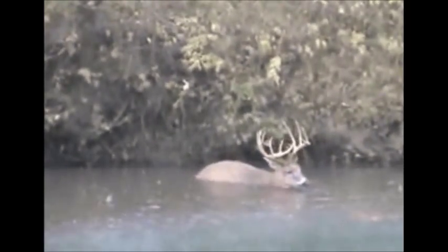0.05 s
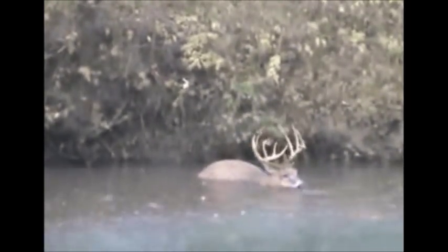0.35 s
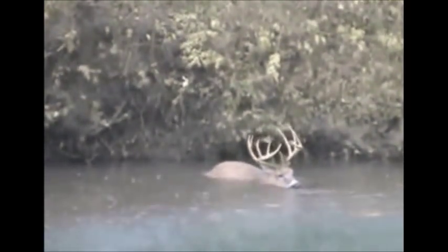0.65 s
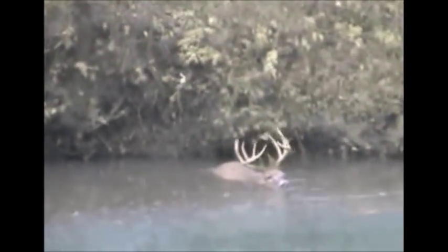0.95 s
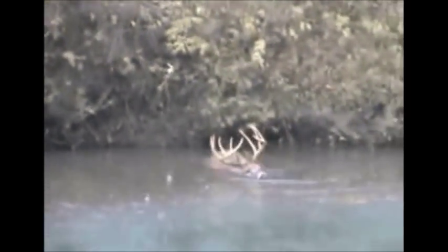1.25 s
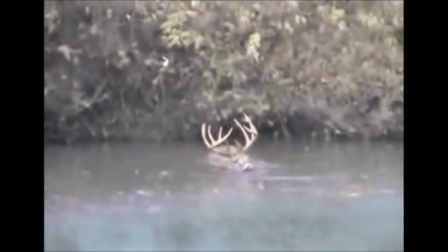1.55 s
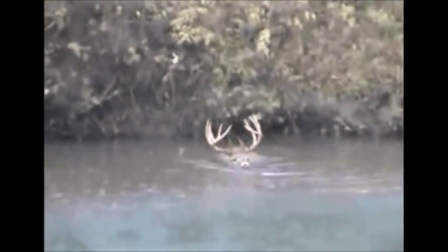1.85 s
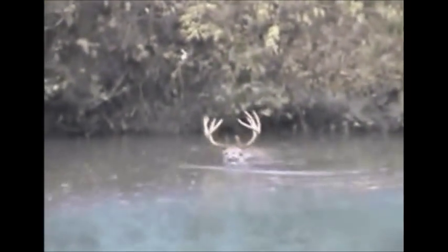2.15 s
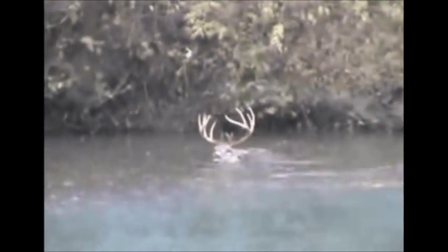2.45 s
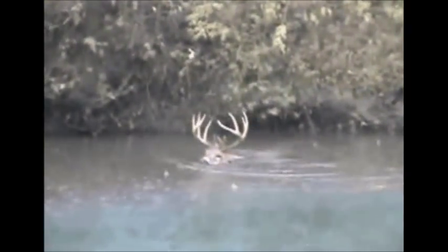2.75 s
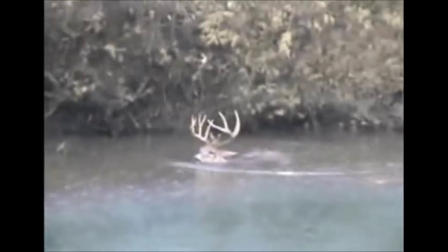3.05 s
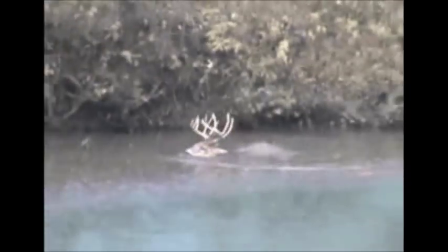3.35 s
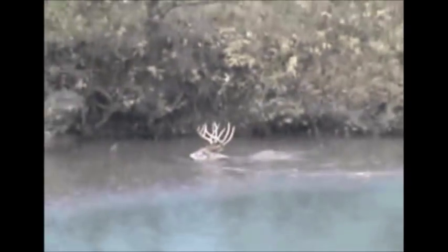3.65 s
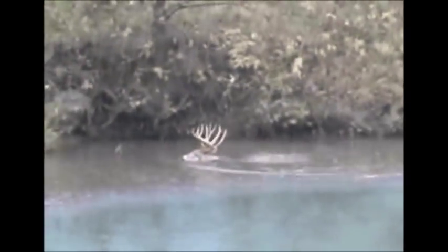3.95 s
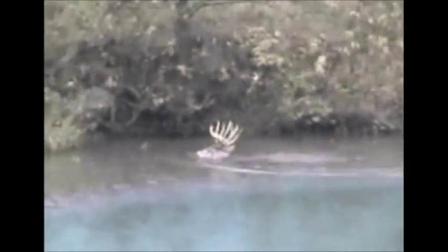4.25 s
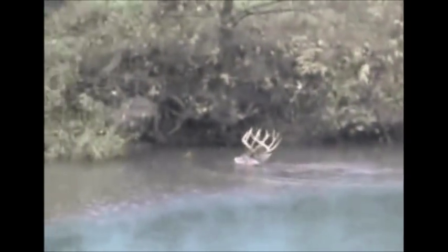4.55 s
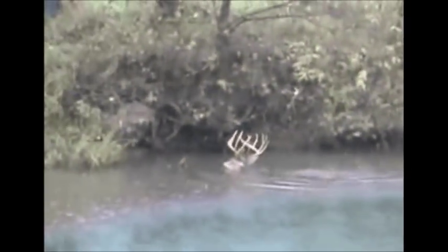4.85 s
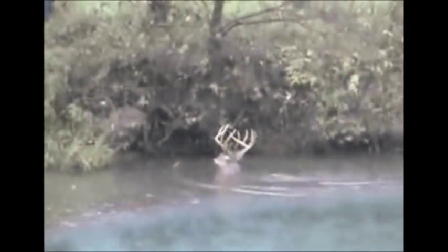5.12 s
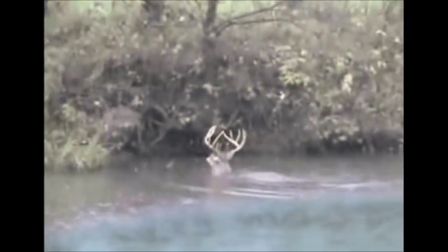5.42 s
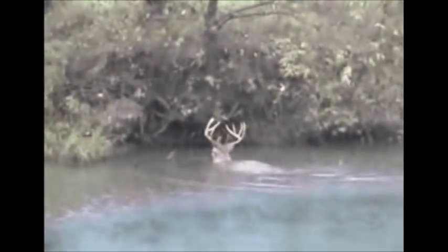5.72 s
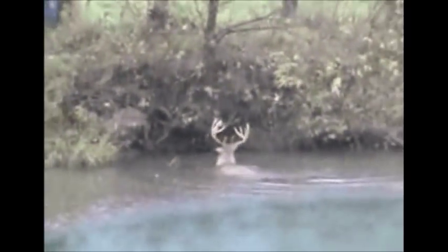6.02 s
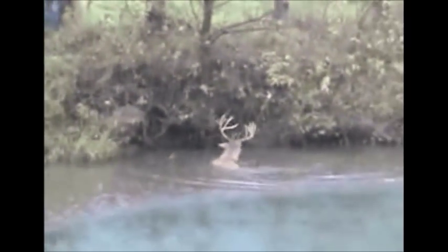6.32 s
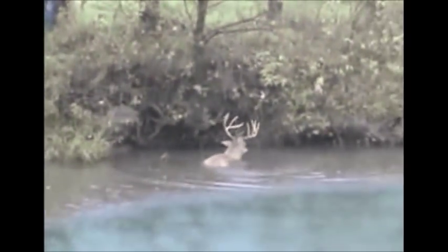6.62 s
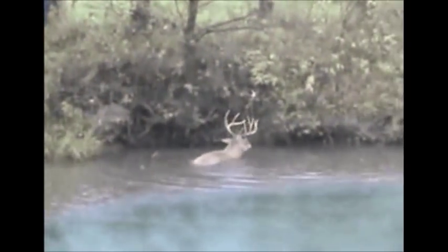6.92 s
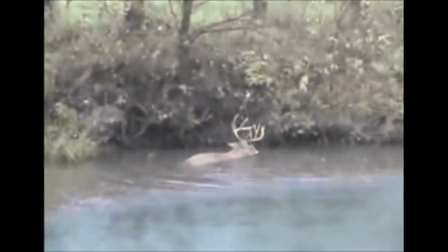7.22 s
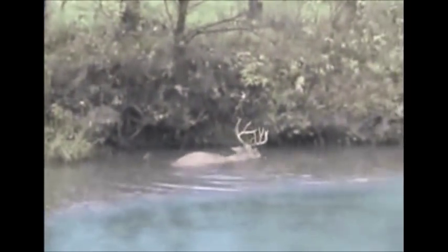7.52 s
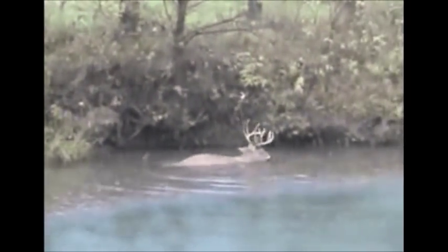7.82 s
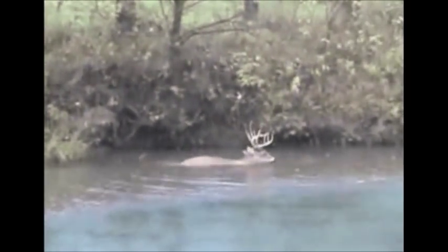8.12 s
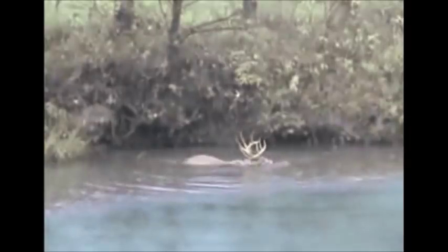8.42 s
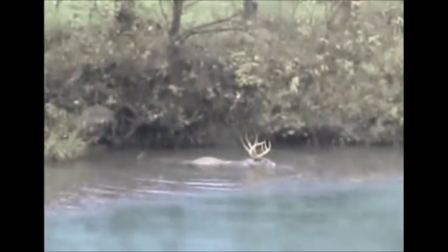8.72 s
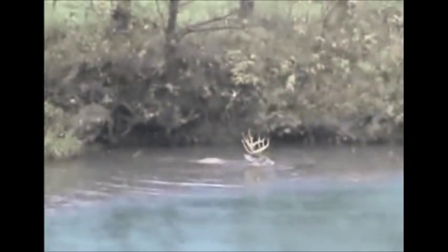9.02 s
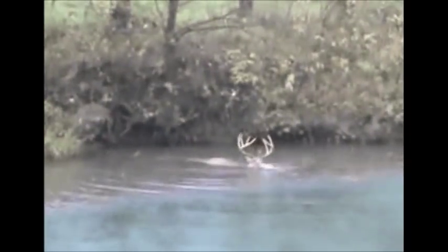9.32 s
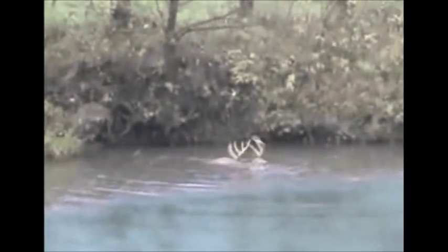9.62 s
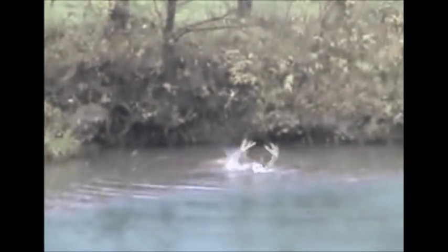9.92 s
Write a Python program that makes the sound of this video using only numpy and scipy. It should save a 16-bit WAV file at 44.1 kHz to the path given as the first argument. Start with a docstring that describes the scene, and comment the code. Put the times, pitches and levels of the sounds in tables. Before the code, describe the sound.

Light rain hisses steadily on a river, heard from inside a car idling on the bank. Close to the microphone a turn signal ticks and tocks evenly over a faint engine hum and a low, uneven rumble. Drops tap on the car now and then. Around the middle a few small plops come from the water, and later one soft, deep thump sounds on the car body.

```python
"""A soft hiss of light rain over a low, uneven rumble, heard from inside an idling car on a river bank.
Far drops on the river blend into the hiss; close to the microphone the engine hums in the cabin,
the indicator relay ticks on and off in the dashboard, and light drops tap on the car.
Short taps and dull knocks stand out of the rain, and the rumble briefly swells and surges;
later come a few plops into the water and one soft thump on the car body."""
import sys
import numpy as np
from scipy import signal
from scipy.fft import rfft, irfft
from scipy.io import wavfile
from scipy.ndimage import uniform_filter1d

SR = 44100
rng = np.random.default_rng(int(sys.argv[2]) if len(sys.argv) > 2 else 0)


def to_wav(s):
    """Save 16-bit WAV."""
    ch = np.atleast_2d(s).T  # columns
    pcm = np.round(np.clip(ch, -1, 1) * 32767)  # PCM
    wavfile.write(sys.argv[1], SR, pcm.astype(np.int16))


N = 439677


def undb(db):
    """Decibels to amplitude."""
    return 10 ** (np.asarray(db) / 20)


def unit(x):
    """Scale to rms 1."""
    return x / np.sqrt(np.mean(x ** 2))


def curve(rows):
    """Rows of (time [s], value) joined by straight lines."""
    return np.interp(np.arange(N) / SR, *np.transpose(rows))


def walk(per_s):
    """Random levels held for 1 / per_s seconds and smoothed twice; rms 1."""
    hold = int(SR / per_s)
    steps = np.repeat(rng.standard_normal(N // hold + 1), hold)
    return unit(uniform_filter1d(uniform_filter1d(steps, hold), hold)[:N])


def band(x, low_hz, high_hz, order=3):
    """Causal band-pass."""
    sos = signal.butter(order, [low_hz, high_hz], "band", fs=SR, output="sos")
    return signal.sosfilt(sos, x + 1e-18)


def colour(x, points):
    """Shape a spectrum by (frequency [Hz], gain [dB]) points, falling steeply beyond them; rms 1."""
    hz, db = np.transpose(points)
    bin_hz = np.maximum(np.arange(N // 2 + 1) * SR / N, 1)
    gain = undb(np.interp(np.log(bin_hz), np.log(hz), db))
    skirts = np.minimum(1, np.minimum(bin_hz / hz[0], hz[-1] / bin_hz)) ** 6
    return unit(irfft(rfft(x) * gain * skirts, N))


def fade(t, t60):
    """Exponential decay, 60 dB in t60 seconds."""
    return np.exp(-np.log(1000) * t / t60)


def add(out, start_s, sound):
    """Mix a sound in at start_s."""
    i = max(int(start_s * SR), 0)
    out[i:i + len(sound)] += sound[:max(N - i, 0)]


def burst(low_hz, high_hz, t60, rise_s, tail_db, tail_t60):
    """A short contact noise and its reflections in the cabin; rms 1 over the first 10 ms."""
    t = np.arange(SR // 8) / SR
    envelope = (fade(t, t60) + undb(tail_db) * fade(t, tail_t60)) * (1 - np.exp(-t / rise_s))
    noise = band(rng.standard_normal(len(t)) * envelope, low_hz, high_hz)
    return noise / np.sqrt(np.mean(noise[:SR // 100] ** 2))


# Spectrum of the rain as it reaches the cabin: (frequency [Hz], relative level [dB])
RAIN_SPECTRUM = [(200, -16), (280, -0.5), (400, -0.76), (600, -3.5), (770, -4.5), (900, -9.5),
                 (1200, -12.5), (1700, -12), (2100, -17), (2800, -17.5), (4200, -23), (5300, -26),
                 (6700, -25.5), (7600, -28.5), (8400, -37)]
# Swell shared by hiss and patter: (time [s], gain [dB])
RAIN_SWELL = [(0, -36), (0.9, -38), (2, -38.5), (3, -38.5), (4.8, -38), (5.15, -38), (5.8, -38), (6.8, -37),
              (7.5, -36.5), (8.3, -38), (9.9, -36.5)]


def rain(drops_per_s=480, scatter_db=3.5, patter_db=-5.5, hiss_db=0.5, flicker_db=0.5):
    """Far out on the river countless drops make a hiss; nearer ones ring briefly, each at its own pitch."""
    t = np.arange(SR // 40) / SR
    patter = np.zeros(N)
    for when, pitch, size, ring in rng.random((int(drops_per_s * N / SR), 4)):
        hz = 320 * (8200 / 320) ** pitch
        cycles = 2 + 7 * ring
        strength = undb(scatter_db * min(-np.log(1 - size), 4)) * hz / np.sqrt(cycles)
        add(patter, when * N / SR, strength * np.sin(2 * np.pi * hz * t) * fade(t, cycles / hz))
    # reflections in the cabin smear every drop
    reflections = undb(-27) * rng.standard_normal(len(t)) * fade(t, t60=0.046)
    patter += signal.fftconvolve(patter, reflections)[:N]
    patter = undb(patter_db) * colour(patter, RAIN_SPECTRUM)
    hiss = rng.standard_normal(N) * undb(flicker_db * walk(per_s=14))
    hiss = undb(hiss_db) * colour(hiss, RAIN_SPECTRUM)
    return (hiss + patter) * undb(curve(RAIN_SWELL))


# Engine tones in the cabin: (multiple of the firing rate, level [dB])
ENGINE_ORDERS = [(1, -50), (5, -47.5)]


def engine(firing_hz=37.74, wander=0.02, waver_db=2.0):
    """Multiples of the firing rate hum around the microphone; the idle speed wanders."""
    phase = 2 * np.pi * np.cumsum(firing_hz * (1 + wander * walk(per_s=3))) / SR
    return sum(undb(db + waver_db * walk(per_s=6)) * np.sqrt(2) * np.sin(multiple * phase)
               for multiple, db in ENGINE_ORDERS)


# Spectrum of the rumble in the cabin: (frequency [Hz], relative level [dB])
RUMBLE_SPECTRUM = [(15, -22), (32, -12.5), (48, -13), (60, -10.5), (88, -1), (120, -2.5), (155, -1),
                   (195, -0.5), (250, -4.5), (300, -16), (380, -19.5)]
# Its slow rise and fall, before gain and flutter: (time [s], level [dB])
RUMBLE_LEVEL = [(0.0, -35), (1.1, -33), (1.6, -35), (1.85, -36.5), (2.2, -36), (2.6, -36.5), (2.72, -33.5),
                (2.95, -36), (3.3, -35.5), (4.0, -36), (4.16, -31), (4.4, -37.5), (5.1, -35), (5.42, -30),
                (5.85, -36.5), (6.75, -35), (7.2, -34), (7.42, -33), (7.6, -32.5), (8.05, -37), (9.6, -36),
                (9.97, -40)]


def rumble(gain_db=0.2, flutter_db=1.0, deep_db=-52):
    """A low noise fills the cabin, swelling and fluttering over a steady deep bed."""
    deep = unit(band(rng.standard_normal(N), 18, 42))
    level_db = curve(RUMBLE_LEVEL) + gain_db + flutter_db * walk(per_s=11)
    return colour(rng.standard_normal(N), RUMBLE_SPECTRUM) * undb(level_db) + undb(deep_db) * deep


def relay_click(modes, panel, ring_db, ring_t60, crack_db, crack_band_hz, bounce_s, bounce_db,
                knock_db, knock_top_hz, detune=0.004, panel_rise_s=0.007):
    """The armature strikes, bounces once and leaves the housing ringing; low modes last a little longer."""
    t = np.arange(SR // 5) / SR
    struck = [(hz * (1 + detune * rng.standard_normal()), db) for hz, db in modes]
    ring = np.zeros(len(t))
    for hz, db in struck:
        t60 = ring_t60 * (2000 / hz) ** 0.026
        ring += undb(db) * np.sin(2 * np.pi * (hz * t + rng.random())) * fade(t, t60)
    click = undb(ring_db) * ring * (1 - np.exp(-t / 0.0012))
    for s, db in ((0, crack_db), (bounce_s, crack_db + bounce_db)):
        crack = burst(*crack_band_hz, t60=0.02, rise_s=0.001, tail_db=-9, tail_t60=0.13)
        add(click, s, undb(db) * crack)
    # the dashboard answers with a dull knock; its modes build slowly and outlast the click
    knock = burst(284, knock_top_hz, t60=0.08, rise_s=0.005, tail_db=-11, tail_t60=0.2)
    add(click, 0, undb(knock_db) * knock)
    panel_rise = 1 - np.exp(-(t / panel_rise_s) ** 2)
    for hz, db, t60 in panel:
        click += undb(db) * np.sin(2 * np.pi * hz * t) * fade(t, t60) * panel_rise
    return click


# Relay housing modes as the armature closes on the core (tick) and falls back on its stop (tock):
# (frequency [Hz], relative level [dB])
TICK_MODES = [(1916, 6), (2121, 6.5), (2271, 0.5), (2508, 5), (2993, 3), (3213, -9), (3466, 1), (4338, -11),
              (5297, -0.5), (5652, 0), (5792, 0), (6045, 1), (6185, -7), (6799, -6.5), (7536, -13),
              (8080, -5)]
TOCK_MODES = [(1496, 7.5), (1679, 4), (1905, 6.5), (2201, -0.5), (2390, 2), (2998, 2), (3251, -1),
              (4048, 0.5), (4355, -5.5), (4505, -4.5), (4850, -10), (4984, -3.5), (5657, -2), (5787, -10),
              (6126, -10), (6406, -3.5), (6535, -8), (6691, -6.5)]
# Dashboard modes rung by each: (frequency [Hz], level [dB], t60 [s])
TICK_PANEL = [(418, -28.5, .14)]
TOCK_PANEL = [(314.6, -31, 0.18), (390.6, -31.5, 0.2), (1055, -33.5, .17)]


def indicator(first_tick_s=0.0218, first_tock_s=0.4016, blink_s=0.76012,
              scatter_db=0.8, travel_s=0.0083, rustle_db=-52, tick_fall_db_per_s=0.32):
    """Close by in the dashboard, the relay shuts with a bright tick and opens with a hollow tock."""
    out = np.zeros(N)
    for s in np.arange(first_tick_s, N / SR, blink_s):
        tick = relay_click(TICK_MODES, TICK_PANEL, ring_db=-44.0, ring_t60=0.082,
                           crack_db=-43, crack_band_hz=(1600, 6600), bounce_s=0.0026, bounce_db=-3.5,
                           knock_db=-40.0, knock_top_hz=451)
        # the armature rustles on its way to the core
        rustle = burst(3000, 8100, t60=0.021, rise_s=0.003, tail_db=-13, tail_t60=0.05)
        add(out, s - travel_s, undb(rustle_db) * rustle)
        add(out, s, tick * undb(scatter_db * rng.standard_normal() - tick_fall_db_per_s * s))
    for s in np.arange(first_tock_s, N / SR, blink_s):
        tock = relay_click(TOCK_MODES, TOCK_PANEL, ring_db=-44.5, ring_t60=0.094,
                           crack_db=-41.5, crack_band_hz=(900, 4400), bounce_s=0.0047, bounce_db=-6.5,
                           knock_db=-38.5, knock_top_hz=726)
        add(out, s, tock * undb(scatter_db * rng.standard_normal()))
    return out


# Bands of a near tap, from thud up to spray: (low edge [Hz], high edge [Hz])
TAP_BANDS = [(280, 550), (550, 1100), (1100, 2200), (2200, 4500), (4500, 8400)]


def tap(db, pitch_hz, t60, below_db_per_octave=3.5, above_db_per_octave=8.5):
    """One short tap or knock, strongest around its pitch; longer ones also rise more slowly."""
    sound = 0
    for low_hz, high_hz in TAP_BANDS:
        octaves = np.log2(np.sqrt(low_hz * high_hz) / pitch_hz)
        loss_db = max(above_db_per_octave * octaves, -below_db_per_octave * octaves)
        noise = burst(low_hz, high_hz, t60, rise_s=0.35 * t60, tail_db=-10, tail_t60=0.09)
        sound = sound + undb(db - loss_db) * noise
    return sound


# Short taps and dull knocks in the rain: (time [s], level at the pitch [dB], pitch [Hz], t60 [s])
TAPS_AND_KNOCKS = [(0.201, -51, 4500, .014), (0.306, -36, 450, .02), (0.321, -44.5, 4500, .011),
                   (0.466, -47, 4500, .015), (0.498, -45, 4500, .012), (1.385, -41, 1100, .014),
                   (1.715, -51, 4300, .014), (1.829, -37.5, 1300, .018), (2.144, -44, 1800, 0.013),
                   (2.252, -49, 3300, .014), (2.548, -33, 560, 0.032), (3.021, -44.5, 4300, .02),
                   (3.365, -45.5, 2400, .022), (3.798, -37.5, 1100, .016), (5.003, -47, 1400, .02),
                   (5.175, -39, 900, .015), (6.151, -50, 3300, .014), (6.349, -41, 1500, .015),
                   (6.378, -40.5, 2800, 0.031), (6.783, -38, 1100, .015), (7.011, -50, 4800, .012),
                   (7.432, -48, 4500, .014), (7.520, -33, 480, .011), (7.602, -37, 1000, .013),
                   (7.660, -45, 2700, 0.014), (7.970, -37.5, 850, 0.022), (8.212, -42.5, 2400, .018),
                   (8.341, -46, 3300, .014), (8.609, -39, 1000, .014), (8.695, -35.5, 520, .013),
                   (9.131, -44, 2800, .015), (9.174, -44.5, 4500, .015), (9.347, -53, 4500, .014),
                   (9.563, -34.5, 700, .025), (9.595, -40, 1000, .014), (9.631, -43, 1800, .015),
                   (9.820, -45, 3500, .015), (9.866, -37.5, 1000, .015)]


def near_taps(drops_per_s=3, drop_db=-49, drop_low_hz=1500, drop_high_hz=6000):
    """Close by, taps and dull knocks stand out of the rain; light drops hit the car at random."""
    out = np.zeros(N)
    for s, db, pitch_hz, t60 in TAPS_AND_KNOCKS:
        add(out, s, tap(db, pitch_hz, t60))
    for when, pitch in rng.random((int(drops_per_s * N / SR), 2)):
        pitch_hz = drop_low_hz * (drop_high_hz / drop_low_hz) ** pitch
        add(out, when * N / SR, tap(drop_db, pitch_hz, t60=0.018))
    return out


# Brief swells of the cabin's rumble: (middle time [s], frequency [Hz], length [s], peak level [dB])
RUMBLE_SWELLS = [(1.492, 167, .06, -28.5), (2.15, 148, .06, -28), (2.487, 139, .06, -27),
                 (2.674, 145, .055, -25.5), (2.795, 143.5, 0.091, -26.5), (3.16, 171, .07, -30.5),
                 (5.89, 200, .06, -30.5), (7.425, 178, .12, -27.5), (7.715, 178, .08, -27.5)]


def rumble_swells():
    """The rumble swells briefly at about 140-200 Hz and sinks back."""
    out = np.zeros(N)
    for s, hz, length_s, db in RUMBLE_SWELLS:
        t = np.arange(int(length_s * SR)) / SR
        wave = np.sin(2 * np.pi * (hz * t + rng.random()))
        add(out, s - length_s / 2, undb(db) * np.hanning(len(t)) * wave)
    return out


# Brief surges in the cabin's rumble: (middle time [s], length [s], level [dB])
RUMBLE_SURGES = [(1.88, 0.17, -35.5), (2.778, .13, -33.5), (4.17, .14, -38), (6.59, 0.046, -31.5),
                 (8.593, 0.17, -34), (8.794, 0.065, -35), (9.94, 0.054, -34.5)]
# Their spectrum: (frequency [Hz], relative level [dB])
SURGE_SPECTRUM = [(90, -7), (190, 0), (300, -4), (450, -6), (750, -7.5), (1100, -16.5)]


def surges():
    """Short, dull rushes swell out of the rumble and sink back."""
    envelope = np.zeros(N)
    for s, length_s, db in RUMBLE_SURGES:
        add(envelope, s - length_s / 2, undb(db) * np.sqrt(np.hanning(int(length_s * SR))))
    return envelope * colour(rng.standard_normal(N), SURGE_SPECTRUM)


# Plops off the bank: (time [s], start pitch [Hz], end pitch [Hz], length [s], level [dB])
WATER_PLOPS = [(4.6, 1720, 1400, 0.03, -38), (4.8, 2004, 1270, 0.034, -37.5),
               (4.91, 1390, 1740, 0.022, -45), (5.0, 1605, 1450, .032, -41), (5.117, 1650, 1500, .038, -46),
               (6.307, 1560, 1510, 0.033, -41)]


def plops(half_width_hz=190):
    """Out on the water, a narrow band of splash swells and fades as its pitch glides, mostly downward."""
    out = np.zeros(N)
    for s, start_hz, end_hz, length_s, db in WATER_PLOPS:
        n = int(length_s * SR)
        slow_noise = band(rng.standard_normal(n + 2000), 20, half_width_hz, order=2)
        grain = unit(slow_noise[-n:])  # once the filter has settled
        phase = 2 * np.pi * np.cumsum(np.linspace(start_hz, end_hz, n)) / SR
        add(out, s, undb(db) * np.sqrt(2 * np.hanning(n)) * grain * np.sin(phase))
    return out


# Car body modes in the thump: (time [s], frequency [Hz], t60 [s], level [dB])
BODY_MODES = [(7.285, 84, 0.14, -14.5), (7.287, 172, 0.33, -24)]


def thump(push_s=0.0051):
    """A soft push rings two low modes of the car body around the microphone."""
    out = np.zeros(N)
    t = np.arange(SR // 2) / SR
    rise = 1 - np.exp(-t / push_s)
    for s, hz, t60, db in BODY_MODES:
        add(out, s, undb(db) * np.sin(2 * np.pi * hz * t) * fade(t, t60) * rise)
    return out


def scene():
    """Rain outside, relay and engine inside, all on one microphone in the cabin."""
    outside = rain() + near_taps() + plops()
    inside = indicator() + engine() + rumble() + surges() + rumble_swells() + thump()
    return (outside + inside)[None]


def record(dry, top_hz=8150):
    """The camera cuts the treble steeply."""
    return signal.sosfilt(signal.ellip(10, 0.2, 70, top_hz, fs=SR, output="sos"), dry)


dry = scene()
out = record(dry)
to_wav(out)
```